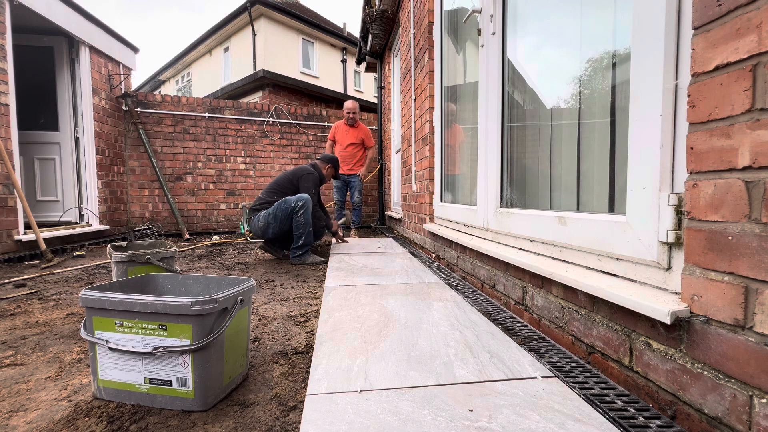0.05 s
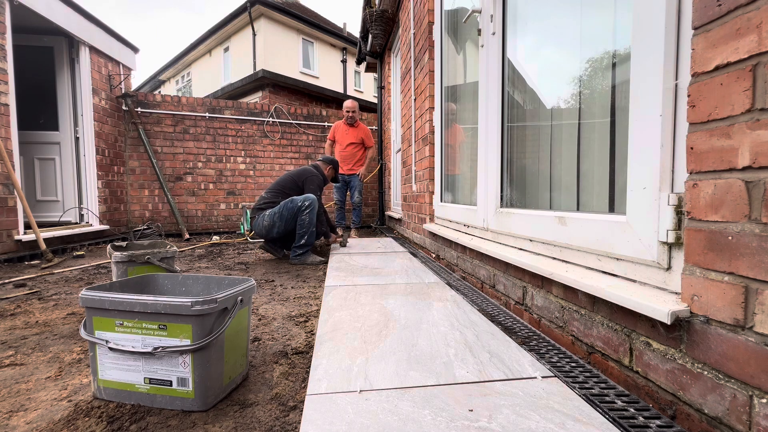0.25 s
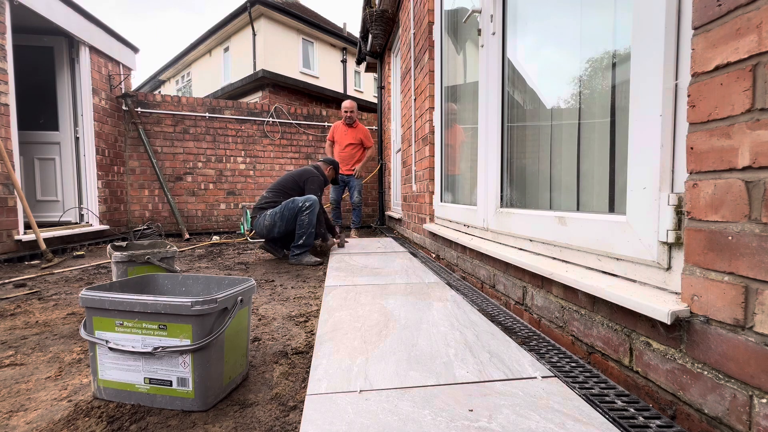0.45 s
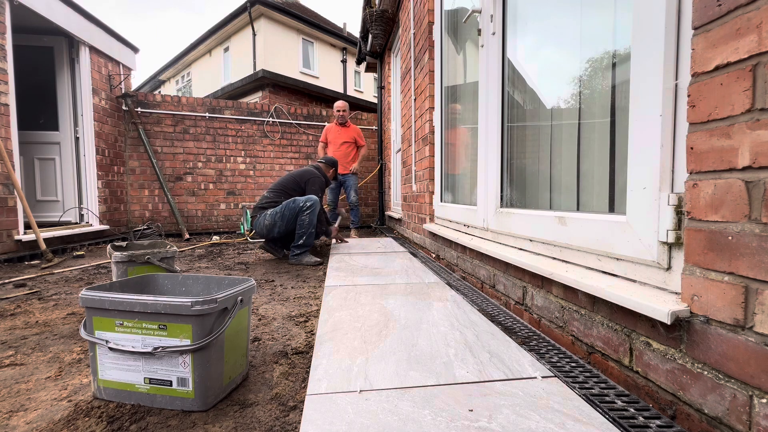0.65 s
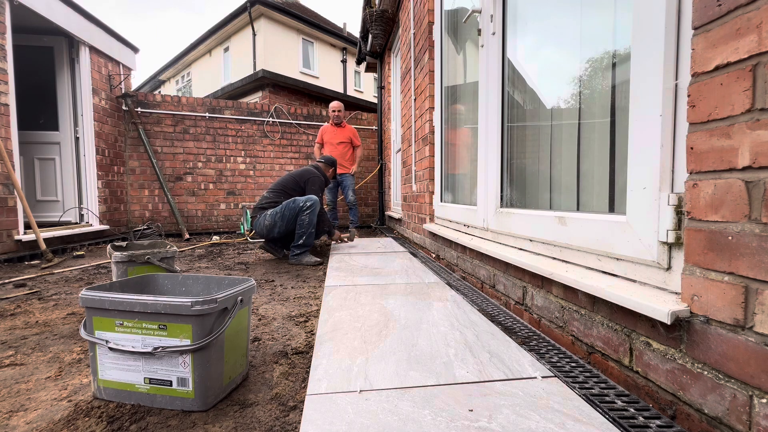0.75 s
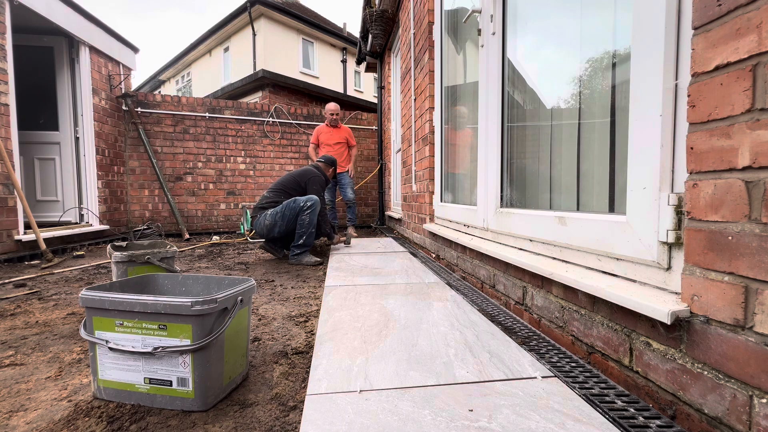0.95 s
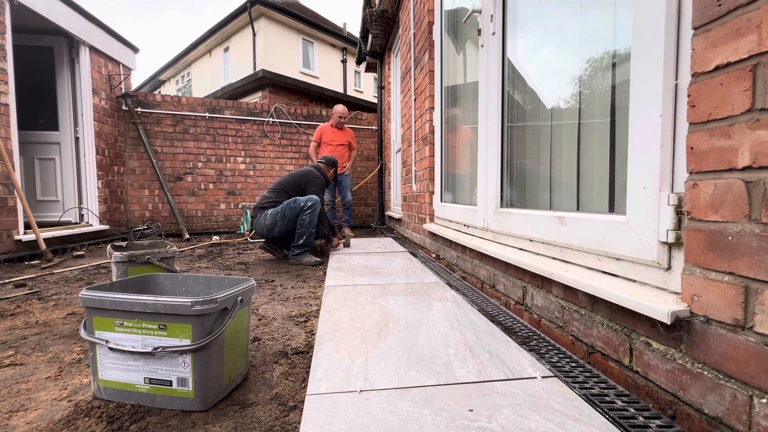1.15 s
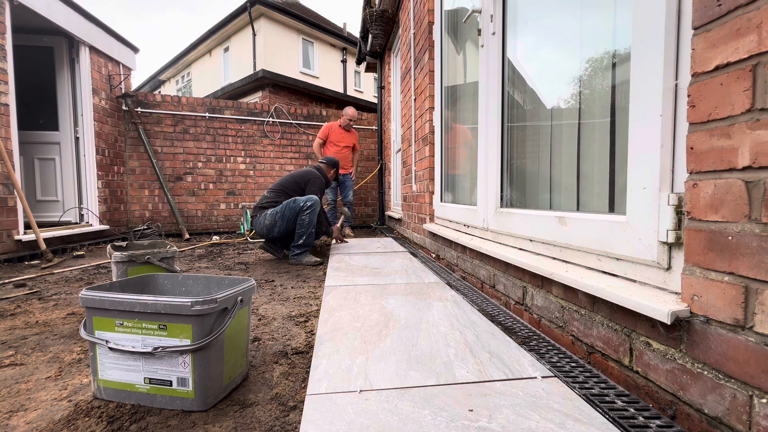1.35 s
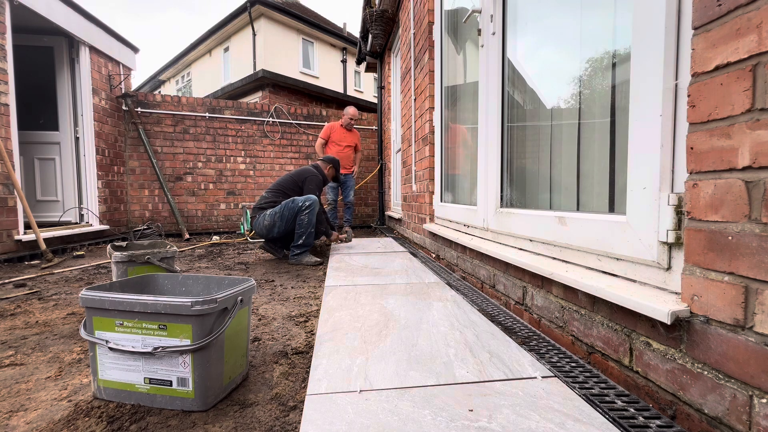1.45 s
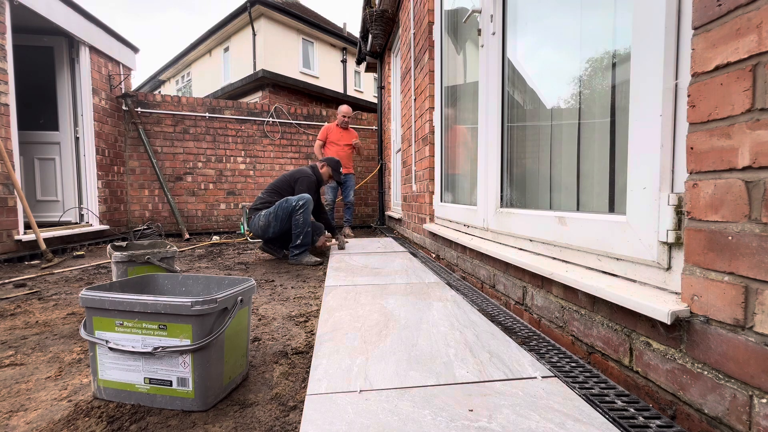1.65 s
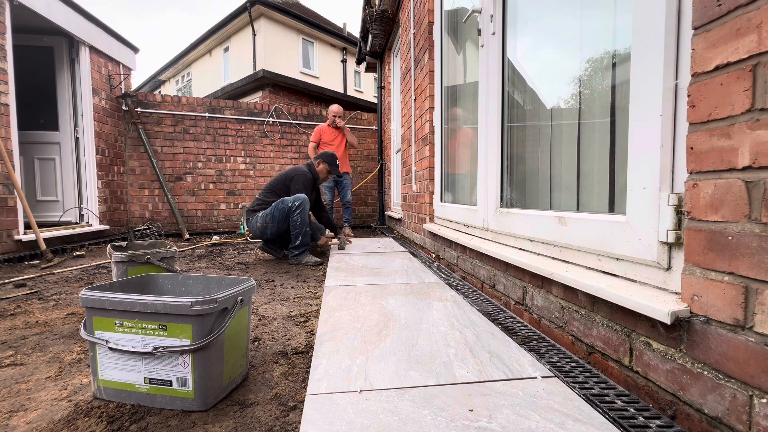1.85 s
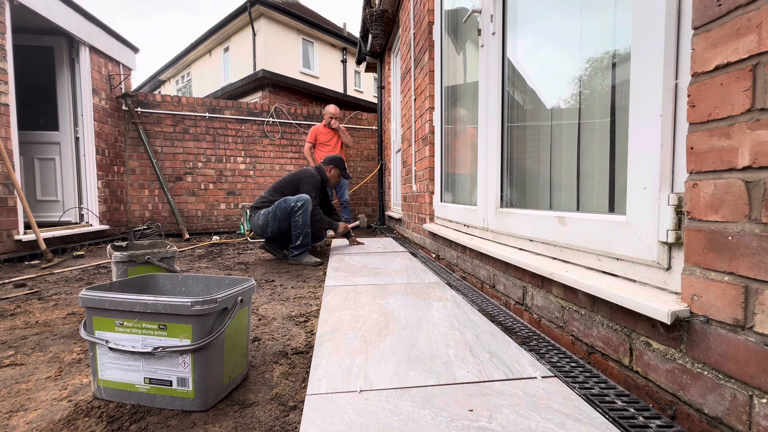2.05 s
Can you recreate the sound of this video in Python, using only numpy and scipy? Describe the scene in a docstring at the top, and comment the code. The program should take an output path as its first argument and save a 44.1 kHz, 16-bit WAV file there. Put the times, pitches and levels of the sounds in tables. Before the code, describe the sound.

Six firm, steady mallet blows on a stone slab in a quiet yard, then a duller tap

```python
"""First a quiet yard with faint open air, distant traffic and a machine's drone; then a mallet strikes a slab.
Six firm blows follow one another at a steady pace, then a weaker, duller one; small scuffs come before,
between and after the blows, and a bird calls at the end.
Each blow is a short noise swell and crack, a set of fading slab tones, and noise scattered by the walls.
Air, traffic and scuffs are coloured noise; the drone is a stack of wavering tones; the bird is one unsteady
tone blurred by echoes. Everything is stereo.
"""
import sys
import numpy as np
from scipy import signal
from scipy.fft import rfft, irfft, next_fast_len
from scipy.io import wavfile
from scipy.ndimage import uniform_filter1d, map_coordinates

SR = 44100
rng = np.random.default_rng(int(sys.argv[2]) if len(sys.argv) > 2 else 0)


def waveform_to_disk(signal):
    """Save audio, clipped to [-1, 1], as 16-bit WAV at the path in sys.argv[1]."""
    frames = np.transpose(np.atleast_2d(signal))
    scaled = np.clip(frames, -1, 1) * 32767
    samples = np.round(scaled).astype(np.int16)
    wavfile.write(sys.argv[1], SR, samples)


N = 92610  # length in samples (2.1 s)


def amp(db):
    """Turn decibels into a gain."""
    return 10 ** (np.asarray(db) / 20)


def unit(x):
    """Scale a signal to an rms of 1."""
    return x / np.sqrt(np.mean(x ** 2) + 1e-20)


def along(points, hz):
    """Read a curve of (Hz, value) points at any frequency, on a log axis."""
    f, v = np.transpose(points)
    return np.interp(np.log(hz + 1), np.log(f + 1), v)


def wobble(rate):
    """A smooth random curve around zero, with rate random points a second."""
    knots = rng.standard_normal(int(N * rate / SR) + 4)
    return map_coordinates(knots, [np.arange(N) * rate / SR])


def sides(db):
    """Left and right gains for a left-right difference in dB."""
    return amp(np.array([db / 2, -db / 2]))


def filtered(x, response):
    """Shape a sound by a gain that depends on frequency."""
    size = next_fast_len(x.shape[-1] + 8192)  # spare room for the filter's tail
    spectrum = rfft(x, size) * response(np.fft.rfftfreq(size, 1 / SR))
    return irfft(spectrum, size)[..., :x.shape[-1]]


def hiss(spectrum, size):
    """Stereo noise of rms 1: coloured by a spectrum and leaning left or right by frequency."""
    # how the yard leans: pitch_hz, left_minus_right_db
    side_lean = [(60, 2.5), (130, -9), (290, -8.5), (640, -1), (1410, 0), (3100, -3), (6820, -4.5),
                 (15000, -1.0)]
    noise = rng.standard_normal((2, size))
    return unit(filtered(noise, lambda hz: amp(along(spectrum, hz)) * sides(along(side_lean, hz))))


def burst(t, rise, t60):
    """Loudness that swells up to t = 0, then dies by 60 dB in t60 seconds."""
    swelling = np.exp(np.minimum(t, 0) / rise)
    dying = amp(-60 * np.maximum(t, 0) / t60)
    return np.where(t < 0, swelling, dying)


def open_air():
    """The open air: soft coloured noise whose level drifts slowly."""
    # colour of the air: pitch_hz, level_db (per Hz, relative)
    air_colour = [(15, -50), (25, -13.5), (154, -7.5), (251, -21.5), (494, -15), (703, -15), (1500, -22),
                  (2140, -23), (7650, -43), (10000, -34.5), (16400, -69)]
    return amp(-62 + 1.68 * wobble(6.09)) * hiss(air_colour, N)


def traffic():
    """Distant traffic: low noise that comes in uneven lumps."""
    # colour of the rumble: pitch_hz, level_db (per Hz, relative)
    rumble_colour = [(50, -31), (90, -4), (140, 0.5), (220, -11.5), (380, -8), (520, -29), (700, -92)]
    level_db, lumps_db = -67, 5
    return amp(level_db + lumps_db * wobble(12)) * hiss(rumble_colour, N)


def hum():
    """A distant machine's drone: upper multiples of one low pitch, each wavering in level and phase."""
    # tones of the drone: multiple (of the base pitch), level_db (relative)
    multiples = [(5, -5), (10, -6.5), (11, -1), (12, -1), (20, -16.5), (24, -12)]
    # overall level of the drone through time: time_s, level_db
    level_path = [(0, -73), (.12, -68), (.4, -68), (1.1, -74), (1.55, -65), (1.7, -64), (1.76, -60.5),
                  (1.83, -68.5), (1.95, -66), (2.1, -68.5)]
    base_hz, waver_db, left_minus_right_db = 61.5, 4.5, -5
    t = np.arange(N) / SR
    drone = np.zeros((2, N))
    for multiple, db in multiples:
        waver = waver_db * np.array([wobble(12), wobble(12)])  # each side wavers by itself
        start_phase = rng.uniform(0, 2 * np.pi, (2, 1))
        phase = 2 * np.pi * multiple * base_hz * t + start_phase + 1.8 * wobble(14)
        drone += amp(db + waver) * np.sin(phase)
    level = amp(np.interp(t, *np.transpose(level_path)))
    return level * sides(left_minus_right_db)[:, None] * drone


def bird():
    """A bird: one gliding, unsteady whistle, blurred by a short tail of random echoes on each side."""
    # points the whistle glides through: time_s, pitch_hz, level_db (both before the random wobble)
    call = [(1.79, 2050, -84), (1.835, 2090, -62), (1.855, 1950, -78), (1.88, 1870, -71),
            (1.905, 1990, -61), (1.935, 1930, -78), (1.965, 1750, -69), (2.0, 1690, -67), (2.02, 1800, -72),
            (2.035, 2090, -61), (2.055, 2180, -67), (2.08, 2040, -62), (2.1, 2080, -60)]
    wobble_hz, echo_t60_s = 85, 0.06
    s, hz, db = np.transpose(call)
    t = np.arange(N) / SR
    pitch = np.interp(t, s, hz) + wobble_hz * wobble(73)
    level = amp(np.interp(t, s, db, left=-140) + 3 * wobble(90))
    song = level * np.sin(2 * np.pi * np.cumsum(pitch) / SR)
    echo = rng.standard_normal((2, SR // 5)) * amp(-60 * t[:SR // 5] / echo_t60_s)
    echo = echo / np.linalg.norm(echo[0])
    return signal.fftconvolve(song[None], echo, axes=1)[:, :N]


def scuffs():
    """Small gritty rustles: noise that swells and dies, roughened by fast random level changes."""
    # one row per scuff: peak_s, level_db (before the roughness), rise_s, t60_s
    rustles = [(.045, -73, 0.005, 0.079), (.37, -64.5, 0.055, 0.6), (.627, -61.5, 0.0047, 0.24),
               (1.6, -68, .012, 0.069), (1.869, -68, 0.0066, 0.081)]
    # colour of the grit: pitch_hz, level_db (per Hz, relative)
    grit_colour = [(500, -30), (1200, 0), (2700, -8), (4500, -11), (6500, -19), (10000, -17), (15500, -26)]
    t = np.arange(N) / SR
    shape = sum(amp(db) * burst(t - s, rise, t60) for s, db, rise, t60 in rustles)
    return shape * amp(5.7 * wobble(200)) * hiss(grit_colour, N)


def walls(t, tilt_db):
    """The blow scattered by the yard: each frequency dies at its own speed; a duller blow scatters duller."""
    # colour of the scattered sound: pitch_hz, level_db (per Hz, relative)
    scatter_colour = [(40, -61.5), (90, -36), (170, -20.5), (400, -7), (780, -8.5), (1220, -18.5),
                      (2500, -31.5), (5270, -39.5), (9640, -39), (13700, -51), (16400, -99)]
    # how fast the yard's sound dies: pitch_hz, t60_s
    yard_decay = [(60, 0.45), (160, 0.46), (420, 0.13), (1100, 0.2), (2900, 0.21), (7700, 0.16),
                  (15000, 0.18)]
    tilt_share, patches_db, rise_s = 0.22, 1.5, 0.0013
    hz, frame_s, cells = signal.stft(hiss(scatter_colour, len(t)), SR, nperseg=256)
    tilt = tilt_share * tilt_db * np.log2(np.maximum(hz, 1200) / 1200)[:, None]
    # random patches, smoothed over nearby frequencies and moments
    patches = uniform_filter1d(rng.standard_normal(cells.shape[1:]), size=5, axis=0)
    patches = unit(uniform_filter1d(patches, size=2, axis=1))
    decay_db = -60 * np.maximum(frame_s + t[0], 0) / along(yard_decay, hz)[:, None]
    fade = amp(patches_db * patches + tilt + decay_db)
    scattered = signal.istft(cells * fade, SR, nperseg=256)[1][:, :len(t)]
    return scattered * (1 - np.exp(-np.maximum(t, 0) / rise_s))


def ring(t, tilt_db, length, soft_hz):
    """The slab's own tones after a blow; low ones build up more slowly, the right side hears them later."""
    # tones of the slab: pitch_hz, level_db (relative), t60_s (before the ring length share), left_minus_right_db
    slab_tones = [(93.3, -13, 0.33, -5), (147.56, -16.5, 0.48, -8), (155.1, -3.5, 0.13, -8.5),
                  (169.5, -8.5, 0.18, -1), (245.4, -6.5, 0.17, -12.5), (331.5, -8, 0.1, -8),
                  (377.3, -11.5, 0.11, -6), (492.7, -1, 0.026, -12.5), (534, -6, 0.087, -12.5),
                  (653.7, -10, 0.079, -4.5), (863, -4.5, 0.055, -7.5), (978, 5, 0.018, 6),
                  (1239, -12.5, 0.062, -4), (2238, -10, 0.085, -1)]
    scatter_db, attack_cycles, phase_spread_rad = 1.2, 0.9, 0.25
    right_lag_s = 0.00068
    waver_db, waver_knots = 3, 24  # uneven ring: random level waver, random points per ring
    hz, db, t60, pan = np.transpose(slab_tones)[..., None]
    after = np.maximum(t - np.reshape([0, right_lag_s], (2, 1, 1)), 0)

    tilt = tilt_db * np.log2(hz / 300)
    scatter = scatter_db * rng.standard_normal(hz.shape)
    level = amp(db + tilt + scatter - 60 * after / (length * t60)) * sides(pan)
    level = level / (1 + (hz / soft_hz) ** 4)  # a soft blow rings fewer high tones

    knots = rng.standard_normal((len(hz), waver_knots))
    knot_s = np.linspace(0, t[-1], waver_knots)
    waver = np.array([np.interp(t, knot_s, row) for row in knots])
    level = level * amp(waver_db * waver * np.clip(t / 0.06, 0, 1))  # the waver grows in over 60 ms

    phase = phase_spread_rad * rng.standard_normal((2, *hz.shape))
    build_up = 1 - np.exp(-after * hz / attack_cycles)
    return np.sum(level * np.sin(2 * np.pi * hz * after + phase) * build_up, axis=1)


def mallet():
    """Every mallet blow: a short swell, the crack of the face, the ringing slab and the walls."""
    # one row per blow: start_s, strength_db, then over strength: crack_db, low_swell_db, bright_swell_db;
    # crack_tilt_db and ring_tilt_db (per octave), walls_db (added to yard_db), ring_length (share)
    blows = [(0.215, -12.5, -5, -7.5, -15.5, -1, 0.35, 2, 1.2),
             (0.455, -10.5, -5, -17, -21.5, 1, 0.23, 1, 1),
             (0.688, -10, -2.5, -20, -18, -2, -0.86, -0.5, 0.88),
             (0.9173, -10.5, -6.5, -19, -23.5, -0.65, 0.21, 1, .98),
             (1.1447, -7, -11, -10.5, -19, -0.5, 0, -1, 0.8),
             (1.372, -11, -5, -23.5, -27.5, -3, .4, 2.5, 0.99),
             (1.642, -19, -26, -39, -55, -8.5, 0.56, -12, 0.66)]
    # colour of the crack: pitch_hz, level_db (per Hz, relative, before the tilt)
    crack_colour = [(880, -7.5), (1500, -3), (2040, -9.5), (3610, -12), (5450, -19.5), (6140, -12.5),
                    (9070, -16), (14900, -29), (16400, -30)]
    # colour of the low swell: pitch_hz, level_db (per Hz, relative)
    low_swell_colour = [(29, -47.5), (50, -3), (214, -0.5), (480, -9.5), (1000, -3), (2850, -29.5),
                        (3000, -21.5), (3900, -60), (6600, -120)]
    crack_rise_s, swell_rise_s, t60_s = 0.00082, 0.015, 0.02
    swell_start_s, opening_s = 0.025, 0.012  # time before the blow; time to open fully
    yard_db = -9.5
    # weaker blows press longer and ring fewer high tones
    firm_db, firm_hz, octaves_per_db = -13, 3500, 0.4544

    out = np.zeros((2, N + SR))
    lead = SR // 20  # samples kept ahead of each blow
    t = (np.arange(SR * 3 // 4) - lead) / SR
    opening = np.clip((t + swell_start_s) / opening_s, 0, 1)
    for s, db, crack_db, low_db, bright_db, tilt_db, ring_tilt_db, walls_db, length in blows:
        soft_hz = firm_hz * 2 ** (octaves_per_db * (db - firm_db))
        face = [(hz, level + tilt_db * np.log2(hz / 3000)) for hz, level in crack_colour]
        crack = amp(crack_db) * hiss(face, len(t)) * burst(t, crack_rise_s, t60_s)
        swell = amp(low_db) * hiss(low_swell_colour, len(t)) + amp(bright_db) * hiss(face, len(t))
        swell = swell * opening * burst(t, swell_rise_s, t60_s)
        slab = ring(t, ring_tilt_db, length, soft_hz)
        yard = amp(yard_db + walls_db) * walls(t, tilt_db)
        first = round(s * SR) - lead
        out[:, first:first + len(t)] += amp(db) * (crack + swell + slab + yard)
    return out[:, :N]


def scene():
    """Open air, traffic, machine, bird, scuffs and mallet together."""
    background = open_air() + traffic() + hum()
    return background + bird() + scuffs() + mallet()


def record(dry):
    """The treble falls away over the last 900 Hz below a top limit."""
    top_hz = 16500
    return filtered(dry, lambda hz: np.clip((top_hz - hz) / 900, 0, 1))


dry = scene()
out = record(dry)
waveform_to_disk(out)
```